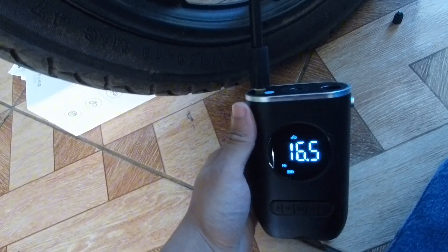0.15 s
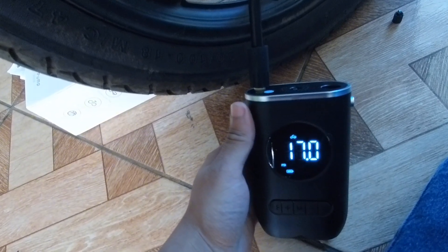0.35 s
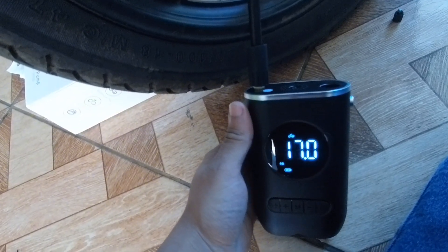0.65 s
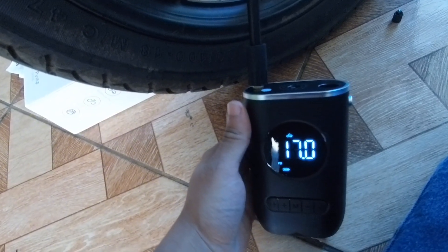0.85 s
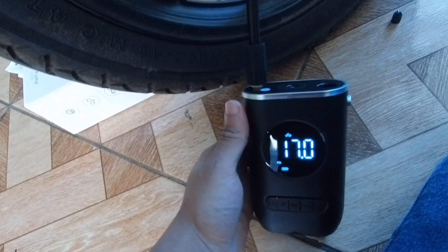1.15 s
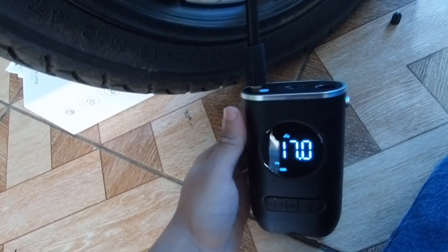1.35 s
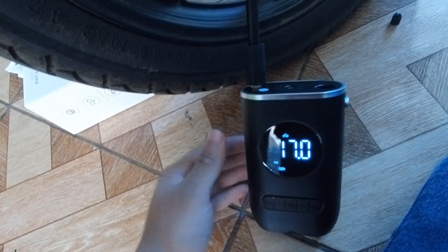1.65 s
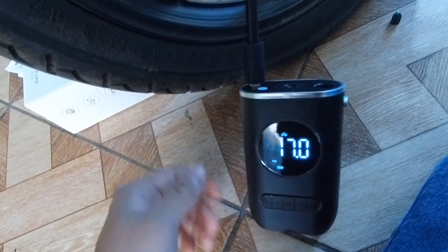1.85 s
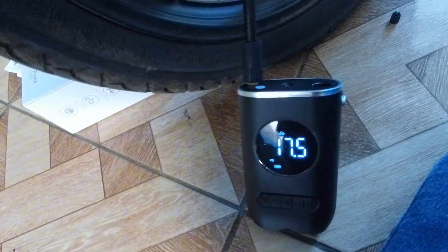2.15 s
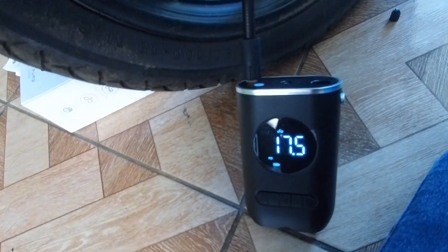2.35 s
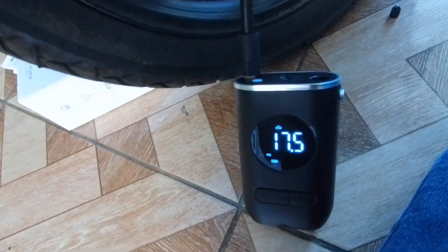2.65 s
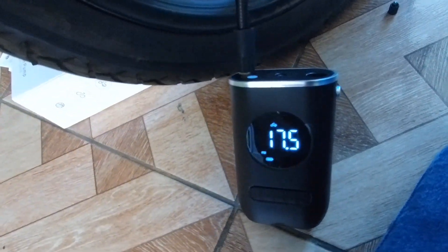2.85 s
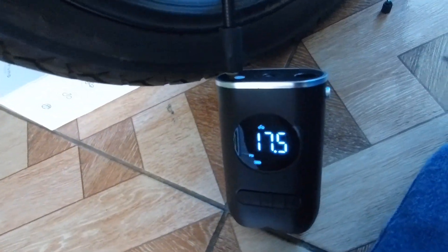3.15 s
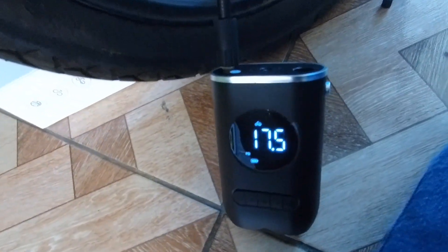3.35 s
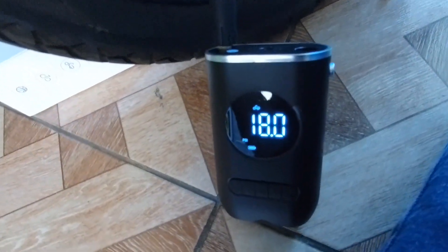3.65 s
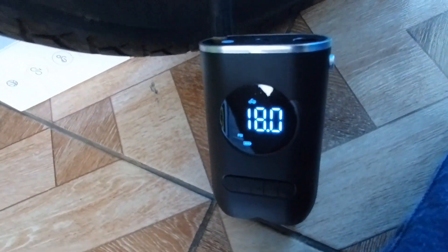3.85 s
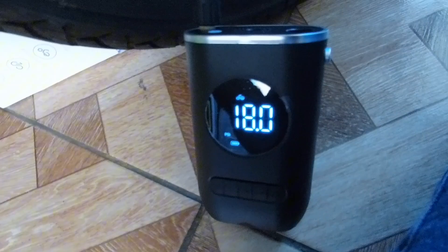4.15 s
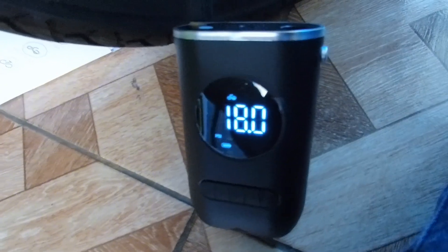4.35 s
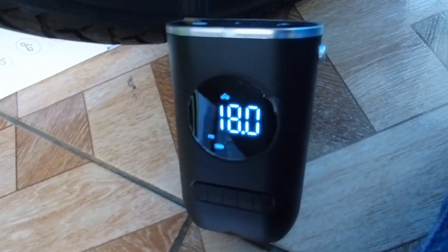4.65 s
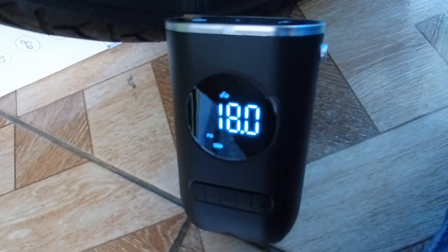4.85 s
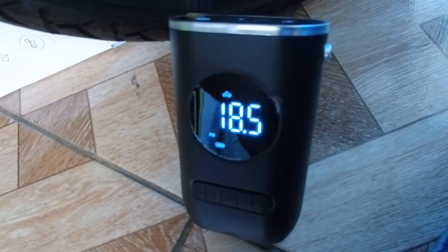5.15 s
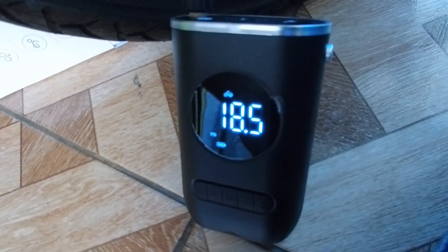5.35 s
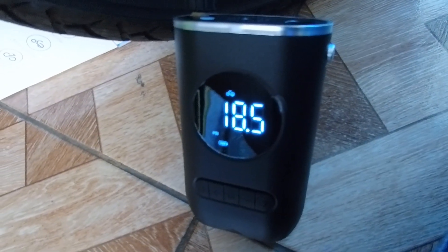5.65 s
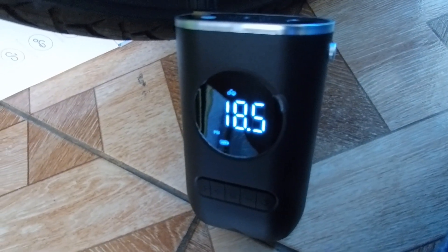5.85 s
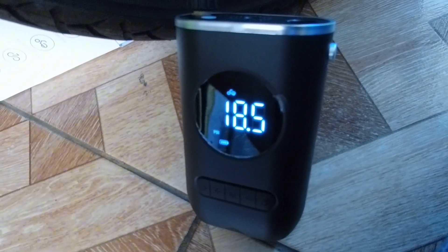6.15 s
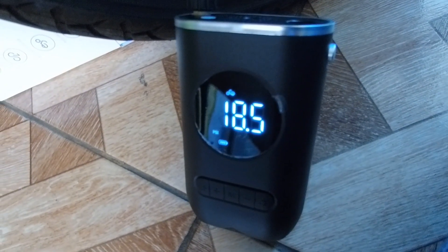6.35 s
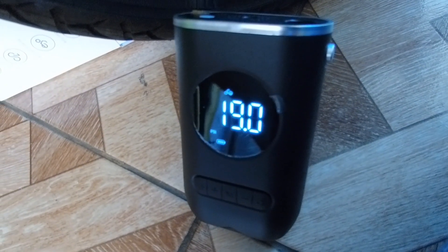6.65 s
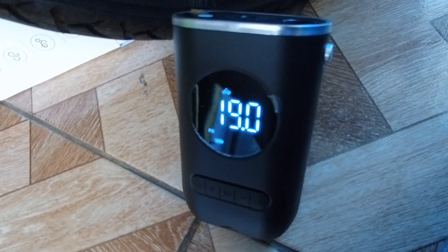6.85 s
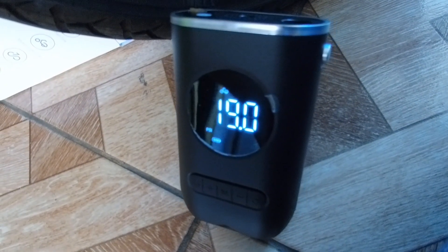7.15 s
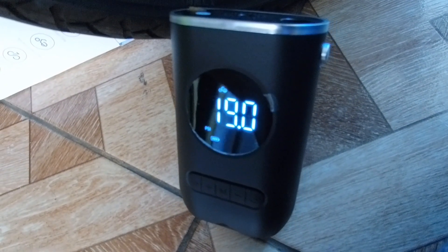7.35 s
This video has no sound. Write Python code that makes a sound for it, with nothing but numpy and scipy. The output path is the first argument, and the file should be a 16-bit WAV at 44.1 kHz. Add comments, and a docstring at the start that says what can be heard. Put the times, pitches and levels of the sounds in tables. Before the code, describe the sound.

A small battery-powered air pump is already running at 0 s and continues to the end, around 7.5 s, with no start or stop. About fifty-five piston knocks a second fuse into a coarse low buzz, with a hollow plastic ring in the mids, a high gear whine, chattering valve and a breathy hiss of air. Until about 1.5 s a hand holds the casing and the tone is firm. Released, it jolts slightly near 1.8 s, then rattles more roughly on the tiles from 2.4 to 3.1 s and again around 3.4 to 4.1 s, the pitch dipping slightly. From 3 to 4.7 s the microphone moves in and the knock grows louder. Afterwards the drone is steady and close, sagging minutely in pitch, with a small jolt near 5.6 s. Treble leans left, most strongly near 5.8 s, over very faint outdoor rumble.

```python
"""Air pump on floor tiles, close up

A small battery pump fills a tyre on a tiled floor, a hand-held two-port microphone close beside it.
Once per crank turn the piston knocks the plastic casing, made of harmonics of the crank speed with rattle noise.
Gear tones whine under the compression load; gated, filtered noise makes rod, valve, seams and rushing air.
The casing is first held by a hand, then rocks on the tiles, then settles while the microphone comes nearer.
"""
import sys
import numpy as np
from scipy import signal
from scipy.fft import rfft, irfft, next_fast_len
from scipy.io import wavfile
from scipy.ndimage import map_coordinates

SR = 44100
rng = np.random.default_rng(int(sys.argv[2]) if len(sys.argv) > 2 else 0)


def generate_wav(signal):
    """Clip the signal to [-1, 1] and save it as 16-bit WAV at the path in sys.argv[1]."""
    frames = np.transpose(np.atleast_2d(signal))
    scaled = np.clip(frames, -1, 1) * 32767
    pcm = np.round(scaled).astype(np.int16)
    wavfile.write(sys.argv[1], SR, pcm)


N = 331191


def amp(db):
    """Decibels to an amplitude factor."""
    return 10 ** (np.asarray(db) / 20)


def unit(x):
    """The signal scaled to an RMS of one."""
    return x / np.sqrt(np.mean(x ** 2) + 1e-20)


def along(points, hz):
    """Interpolates (hz, value) points on a log frequency axis."""
    point_hz, values = np.transpose(points)
    return np.interp(np.log(hz + 1), np.log(point_hz + 1), values)


def curves(rows):
    """One value per sample for each column after the time in seconds."""
    time_s, *columns = np.transpose(rows)
    return [np.interp(np.arange(N) / SR, time_s, column) for column in columns]


def filtered(x, response):
    """Multiplies the spectrum of x by a complex response of frequency."""
    size = next_fast_len(N + 8192)
    return irfft(rfft(x, size) * response(np.fft.rfftfreq(size, 1 / SR)), size)[..., :N]


def modes(table):
    """Response of a causal sum of resonances (centre, width, level_db) with alternating signs."""
    def response(f):
        total = 0
        for k, (centre, width, level_db) in enumerate(table):
            damping = 1j * f * width
            total = total + (-1) ** k * amp(level_db) * damping / (centre * centre - f * f + damping)
        return total
    return response


def wobble(rate):
    """A smooth random curve with `rate` knots a second."""
    return map_coordinates(rng.standard_normal(300), [1 + np.arange(N) * rate / SR])


def by_turn(turns):
    """A smooth random curve with one knot per crank turn."""
    return map_coordinates(rng.standard_normal(500), [turns + 1])


def load(turns, at, rise, fall, rest_db):
    """A pressure pulse once a turn over a resting level: peak angle, rise and fall are in turns."""
    from_peak = (turns - at + rise) % 1 - rise
    rising = np.sin(np.pi / 2 * (1 + from_peak / rise)) ** 2
    falling = np.exp(-np.abs(from_peak) / fall)
    return amp(rest_db) + np.where(from_peak < 0, rising, falling)


# When the casing rocks on the tiles: start_s, end_s
ROCKING_SPANS = [(2.389, 3.066), (3.355, 3.586), (4.032, 4.054)]
ROCK_EDGE_S = .08  # time to tip into or out of rocking


def rocking():
    """1 while the casing rocks, 0 while it lies flat."""
    t = np.arange(N) / SR
    total = 0
    for start_s, end_s in ROCKING_SPANS:
        tips_in = np.clip((t - start_s) / ROCK_EDGE_S + .5, 0, 1)
        tips_out = np.clip((end_s - t) / ROCK_EDGE_S + .5, 0, 1)
        total = total + tips_in * tips_out
    return total


# The freed casing creeps until it has settled
HAND_LIFTS_S, HAND_GONE_S, SETTLED_S = 1.4, 1.6, 4.2


def resting():
    """Shares of the three ways the casing lies: where the hand held it, rocking, settled."""
    rocks = rocking()
    held = curves([(HAND_LIFTS_S, 1), (SETTLED_S, 0)])[0] * (1 - rocks)
    return held, rocks, 1 - held - rocks


# The casing jolts on the floor: time_s, extra_rattle_db
JOLTS = [(1.75, 3), (2.4, 5), (3.1, 8), (3.43, 3), (3.65, 5.5), (4.06, 7), (5.63, 2.5)]
JOLT_RISE_S, JOLT_FALL_S = 0.073, 0.092


def jolts_db():
    """Loose parts shake harder around every jolt."""
    t = np.arange(N) / SR
    total = 0
    for time_s, extra_db in JOLTS:
        spread_s = np.where(t < time_s, JOLT_RISE_S, JOLT_FALL_S)
        total = total + extra_db * np.exp(-np.abs(t - time_s) / spread_s)
    return total


# Crank of the steady casing, sagging as the tyre fills: time_s, speed_turns_per_s
CRANK_SPEED = [(0, 55.126), (0.8, 54.943), (2.2, 54.964), (3.2, 55.023), (4.2, 54.943), (4.7, 54.663),
               (6.2, 54.697), (7.51, 54.466)]
ROCK_DRAG = .795  # turns per s lost while the casing rocks


def crank_turns():
    """Crank angle in turns, the running sum of the speed; the motor hunts a little."""
    speed = curves(CRANK_SPEED)[0] - ROCK_DRAG * rocking()
    return .8 + np.cumsum(speed) / SR + 0.0019 * wobble(9)


# The microphone turns in the hand: time_s, treble_left_minus_right_db (before the shading share)
FACING_TILT = [(0, 7), (2.1, 6.5), (2.65, 8), (2.87, 5.5), (4.12, 8), (4.45, 10), (4.9, 11.5), (5.5, 13),
               (5.85, 14), (6.0, 13), (6.15, 7.5), (7.51, 9.5)]


def facing_db():
    """Treble tilt between the ports as the microphone turns."""
    return curves(FACING_TILT)[0]


# Microphone distance, weighted for each layer below: time_s, gain_db
NEARNESS = [(0, 0), (2.9, 0), (4.75, 4), (5.7, 3.5), (6.15, 3), (7.51, 3)]
# Layers before their own trims: level_db, hand_db, rocking_db,
# then weights in dB per dB: jolt, distance_gain, turning
LAYER_LEVELS = dict(hum=(-50.5, -0.5, -1, 0, 1, 0), knock=(-42, 1.05, 0.5, 0.04, 1.52, -0.09),
                upper=(-49, 1.5, 3, 0.48, .6, 0.32), whine=(-54, 7, 0, 0, 3.5, 1.67),
                reed=(-51.5, -6.5, 4, -0.5, -0.5, 1), overtones=(-55.5, 1.1, -1.5, 0.5, 0.1, 1.47),
                air=(-63, 1.2, 0, 0, 0.4, 0.13), rod=(-51, 3, 0, 0.5, -0.3, 0))
AHEAD_DB = 7  # treble tilt when the microphone points straight


def levels():
    """Each layer's level follows the hand, rocking and jolts, and the microphone's distance and turning."""
    hand = curves([(HAND_LIFTS_S, 1), (HAND_GONE_S, 0)])[0]
    near_db = curves(NEARNESS)[0]
    causes = np.array([np.ones(N), hand, rocking(), jolts_db(), near_db, facing_db() - AHEAD_DB])
    return {name: np.array(row) @ causes for name, row in LAYER_LEVELS.items()}


# Background colour, relative: pitch_hz, density_db_per_hz
BACKGROUND_COLOUR = [(20, -11), (90, -5), (400, -1), (9000, -31)]


def background():
    """Faint outdoor rumble and microphone hiss, as shaped noise."""
    noise = rng.standard_normal((2, N))
    return amp(-65.5) * unit(filtered(noise, lambda f: amp(along(BACKGROUND_COLOUR, f))))


# Colour of the rushing air, relative: pitch_hz, density_db_per_hz
AIR_COLOUR = [(150, -35), (500, -6), (800, 2), (1400, -7.5), (2020, -9), (2700, -10), (3500, -7),
              (4900, -15.5), (6200, -17), (7900, -21.5), (8900, -26), (10200, -27), (11600, -28.5),
              (13300, -31.5), (15600, -32)]


def air(turns, level_db):
    """Air rushes through the vents, stronger after each compression, and flutters unevenly."""
    gate = load(turns, -0.059, 0.28, 0.41, rest_db=3.0) * amp(0.84 * wobble(12))
    flow = gate * rng.standard_normal((2, N))
    return amp(level_db + 17.0) * unit(filtered(flow, lambda f: amp(along(AIR_COLOUR, f))))


# Buzzing casing seams, relative, each resonance applied twice: pitch_hz, width_hz, level_db
SEAM_MODES = [(1338, 143, -8), (5770, 350, -28), (8560, 700, -30.5), (9200, 560, -31.5),
              (10500, 650, -39.5), (13200, 1200, -43)]


def seams(turns, tilt_db):
    """Loose seams of the casing buzz; they stand out as the left port turns towards them."""
    gate = load(turns, -0.03, 0.22, 0.16, rest_db=-9) * amp(2.1 * wobble(23))
    buzz = gate * rng.standard_normal((2, N))

    def ring(f):  # squared resonances have steep flanks
        return sum(amp(db) * modes([(hz, width, 0)])(f) ** 2 for hz, width, db in SEAM_MODES)
    return amp(2.03 * tilt_db - 69.0) * unit(filtered(buzz, ring))


# Reed valve resonances, relative: pitch_hz, width_hz, level_db
REED_MODES = [(3280, 500, -5), (3583, 350, -4.5), (3810, 240, -29)]


def valve(turns, level_db):
    """The reed valve chatters as it lets the charge out, most regularly once the casing has settled."""
    _, rocks, settled = resting()
    flap = np.cos(2 * np.pi * 61 * turns) + .6 * np.cos(2 * np.pi * 66 * turns)
    chatter = amp(-8) * settled * flap + rng.standard_normal((2, N)) * 1.03
    gate = load(turns, -0.078, 0.21, 0.19, rest_db=-28) * amp(0.81 * by_turn(turns))
    charge = gate * chatter
    reed = unit(filtered(charge, lambda f: modes(REED_MODES)(f) / (1 + (3050 / (f + 1)) ** 16)))
    # a rocking casing rattles higher
    loose = unit(filtered(charge, lambda f: modes([(4050, 800, 0)])(f) ** 2))
    return amp(level_db - 2.5) * (reed + 0.44 * rocks * loose)


def repeating(turns):
    """Noise tied to the crank angle: the same worn surfaces meet at every turn."""
    return np.interp(turns % 1, np.arange(512) / 512, rng.standard_normal(512), period=1)


# Colour of the rod clatter, relative: pitch_hz, density_db_per_hz
CLATTER_COLOUR = [(1700, -13), (1820, 14.5), (2050, 6), (2500, 9.5), (2950, 18), (3200, -13), (3600, 11.5),
                  (4400, 5), (5000, -12)]


def linkage(turns, level_db):
    """Crank pin and rod clatter in a pattern that comes back every turn."""
    surfaces = repeating(turns + 0.0007 * by_turn(turns))
    pattern = load(turns, 0.044, 0.13, 0.36, rest_db=-21) * surfaces
    colour = [(1500, -90), *CLATTER_COLOUR]  # almost nothing below 1500 Hz
    return amp(level_db - 3.0) * unit(filtered(pattern, lambda f: amp(along(colour, f))))


# Gear tones, relative, before damping: multiple_of_mesh_rate, level_db
MESH_TONES = [(1, 0), (2, 0), (3, 5), (4, -14)]
TEETH = 45  # tooth contacts per crank turn


def gears(turns, whine_db, overtone_db):
    """Teeth mesh hardest during compression, while the load slows the shaft."""
    shaft_lag = 1.5 * np.sin(2 * np.pi * (turns + 0.56))
    angle = 2 * np.pi * TEETH * turns + shaft_lag + 0.025 * by_turn(turns)
    press = load(turns, -0.21, .19, 0.13, rest_db=-24)
    # slow noise roughens the phase of each tone
    noise = rng.standard_normal((len(MESH_TONES), N))
    grind = filtered(noise, lambda f: 1 / (1 + (f / 240) ** 4))
    phases = [k * angle + 0.36 * k ** 0.49 * unit(g) for (k, _), g in zip(MESH_TONES, grind)]
    # on the return stroke the teeth meet on their other flank
    back = amp(-7) * load(turns, 0.16, .2, .16, rest_db=-12) * np.cos(phases[0] + 2.4)
    whine = unit((press * np.cos(phases[0]) + back) * amp(1.2 * by_turn(turns)))
    second, *higher = [amp(db) * np.cos(p) for (_, db), p in zip(MESH_TONES[1:], phases[1:])]
    # a hand or a rocking casing damps the second
    overtones = (0.59 + 0.32 * resting()[2]) * second + sum(higher)
    overtones = unit(press * amp(1.25 * by_turn(turns)) * overtones)
    return amp(whine_db - 6.0) * whine + amp(overtone_db - 1.0) * overtones


# The casing's answer to a stroke, relative within each band:
# multiple_of_crank_speed, held_db, rocking_db, settled_db
CASING_HARMONICS = [(1, -21.4, -21.2, -24.5), (2, -12.7, -12.7, -15.5), (3, -26.2, -22.6, -27.9),
                    (4, -12.2, -12.4, -13.0), (5, -14.5, -14.3, -12.5), (6, -7.6, -7.7, -10.6),
                    (7, -11.3, -11.0, -13.1), (8, -10.8, -10.4, -15.4), (9, -25.4, -26.4, -23.6),
                    (10, -4.9, -5.1, -9.5), (11, -3.8, -5.8, -7.1), (12, -6.0, -5.1, -12.1),
                    (13, -2.5, -7.1, -5.4), (14, -1.2, -2.6, 0.0), (15, 0.0, -0.7, -4.8),
                    (16, -32.2, -5.4, -16.5), (17, -7.6, -4.6, -6.9), (18, -8.0, 0.0, -13.6),
                    (19, -10.1, -3.7, -14.7), (20, -8.4, -25.0, -18.0), (21, -12.1, -28.9, -16.9),
                    (22, -17.5, -20.5, -18.4), (23, -18.6, -21.8, -18.7), (24, -7.6, -7.8, -14.3),
                    (25, -16.5, -6.5, -17.0), (26, -22.0, -2.4, -32.1), (27, -21.3, -15.8, -13.1),
                    (28, -13.3, -20.6, -16.2), (29, -6.7, -5.0, -12.9), (30, -10.4, -16.3, -26.1),
                    (31, -23.9, -15.5, -32.5), (32, -18.6, -35.7, -29.4)]


def stroke(turns, first, last):
    """Casing harmonics phased as a sharp blow and bounce, then a rebound that rings the main mode."""
    rows = [row for row in CASING_HARMONICS if first <= row[0] <= last]
    k, *levels_db = np.array(rows).T
    bounce = .6 * (k > 18) * np.exp(-2j * np.pi * k * .073)  # .073 turn after the blow
    blow = modes([(5, 35, 0)])(k) * (1 + bounce)
    rebound = modes([(11.7, 1.1, 15.5)])(k) * np.exp(-2j * np.pi * k * .17)
    phase = np.angle(rebound - blow)[:, None]
    angle = np.arange(1025) / 1024
    cycles = amp(levels_db) @ np.cos(2 * np.pi * np.outer(k, angle) + phase)
    return sum(share * unit(np.interp(turns % 1, angle, cycle)) for share, cycle in zip(resting(), cycles))


# Loose parts of the casing, relative: pitch_hz, width_hz, level_db
RATTLE_MODES = [(667, 40, -1.5), (787, 150, -2), (910, 51, -13), (1398, 87, -3), (1470, 290, -12)]


def piston(turns, levels_db):
    """Hum, knock and upper ring of the casing; loose parts rattle along with every blow."""
    shake = load(turns, 0.02, 0.042, 0.27, rest_db=8.0) * amp(jolts_db()) * rng.standard_normal(N)

    def rattle_response(f):
        return modes(RATTLE_MODES)(f) / (1 + (480 / (f + 1)) ** 6) / (1 + (f / 1700) ** 12)
    rattle = filtered(shake, rattle_response)
    low = filtered(rattle, lambda f: 1 / (1 + (f / 1120) ** 12))
    # hum, knock, upper ring: first and last crank multiple, scatter_db, rattle noise
    bands = [(0.998, 8, 0.12, 0 * low),
             (9.02, 20, 0.07, amp(-15.5) * unit(low)),
             (20.76, 32, 0.26, amp(-9.5) * unit(rattle - low))]
    late = turns + 0.00085 * by_turn(turns)  # no two blows land at quite the same angle
    out = 0
    for level_db, (first, last, scatter_db, noise) in zip(levels_db, bands):
        ring = stroke(late, first=first, last=last)
        out = out + amp(level_db) * unit(amp(scatter_db * by_turn(turns)) * ring + noise)
    return out


# The microphone body shades the right port: pitch_hz, fixed_left_lead_db, share_of_treble_tilt
BODY_SHADE = [(60, 2.4, 0), (300, .2, .3), (700, -.4, .3), (1300, -5, .75), (2400, -2.8, 1.5),
              (4400, -3, 1.4), (8100, 8, .85), (15000, 1.2, .95)]


def microphone(sound, tilt_db):
    """The left port is nearer, so it leads in time; the body shades the ports by frequency and turning."""
    def lead(f):  # 1.8 samples early on the left, as late on the right
        return np.exp(2j * np.pi * f * np.array([[1.8], [-1.8]]) / SR)
    hz, t, spectrum = signal.stft(filtered(sound, lead), SR, nperseg=512)
    shade = np.array(BODY_SHADE)
    lead_db = along(shade[:, [0, 1]], hz)[:, None]
    tilt_share = along(shade[:, [0, 2]], hz)[:, None]
    ratio = amp(-lead_db - tilt_share * np.interp(t, np.arange(N) / SR, tilt_db))  # right over left
    gains = 2 * np.array([1 / (1 + ratio), ratio / (1 + ratio)])
    return signal.istft(spectrum * gains, SR, nperseg=512)[1][:, :N]


def scene():
    """One crank drives every part of the pump; the two-port microphone hears them over the background."""
    turns = crank_turns()
    db, tilt_db = levels(), facing_db()
    wide = background() + air(turns, db['air']) + seams(turns, tilt_db) + valve(turns, db['reed'])
    # long waves reach both ports alike
    wide = wide + filtered(wide[::-1] - wide, lambda f: .5 / (1 + (f / 1300) ** 3))
    direct = linkage(turns, db['rod']) + gears(turns, db['whine'], db['overtones'])
    direct = direct + piston(turns, [db['hum'], db['knock'], db['upper']])
    return microphone(direct + wide, tilt_db)


TOP_HZ = 15650


def record(dry):
    """The recorder keeps nothing above its band limit."""
    return filtered(dry, lambda hz: hz < TOP_HZ)


dry = scene()
out = record(dry)
generate_wav(out)
```